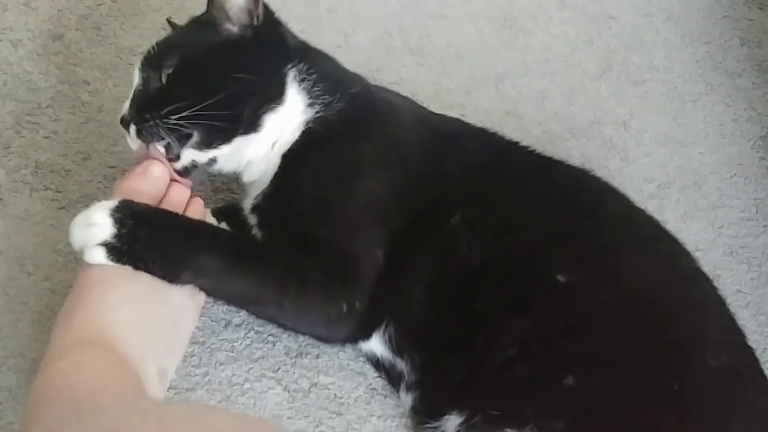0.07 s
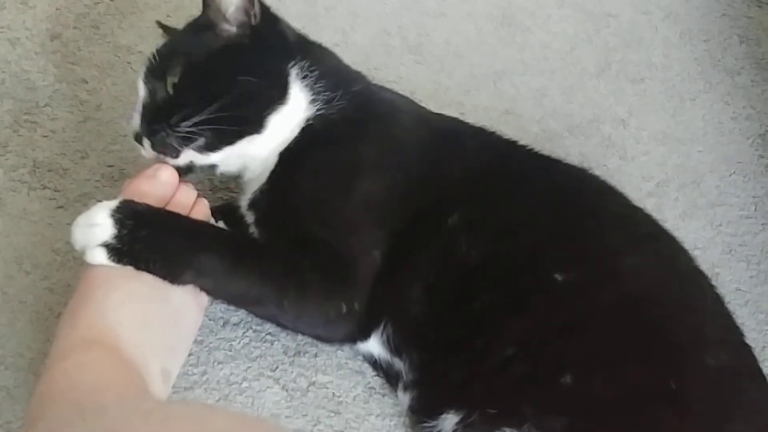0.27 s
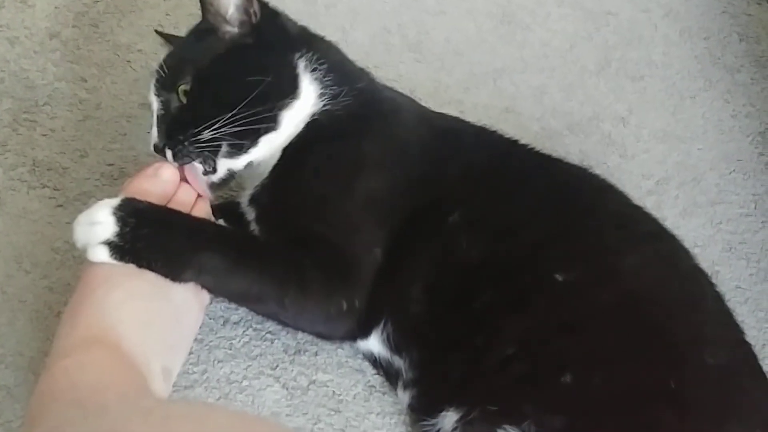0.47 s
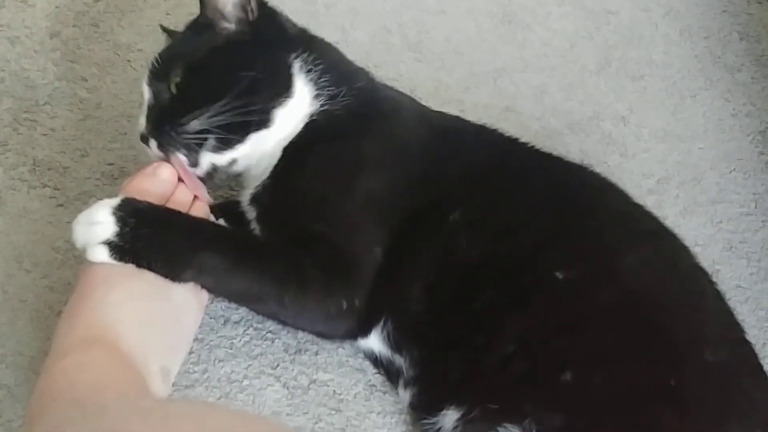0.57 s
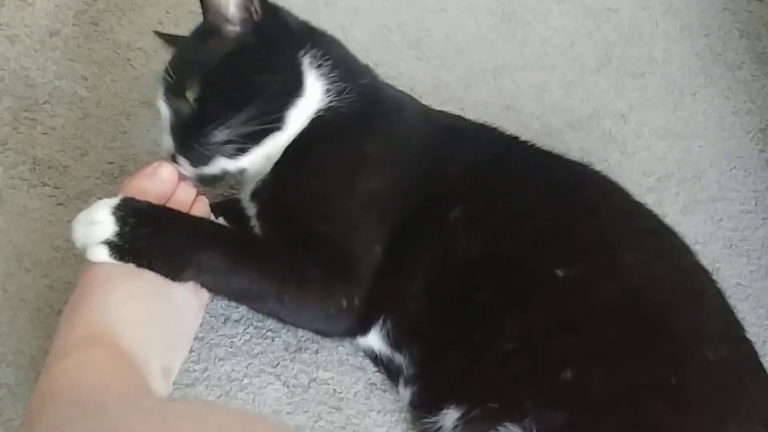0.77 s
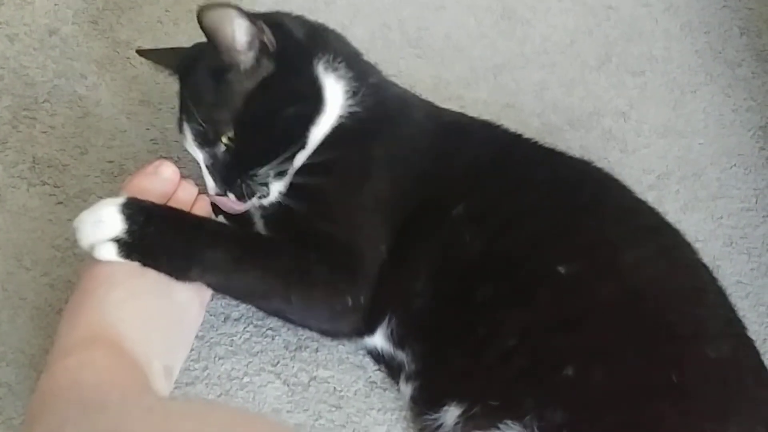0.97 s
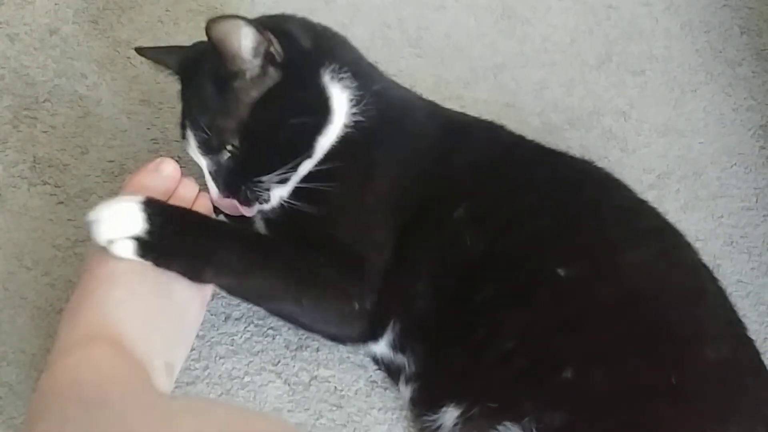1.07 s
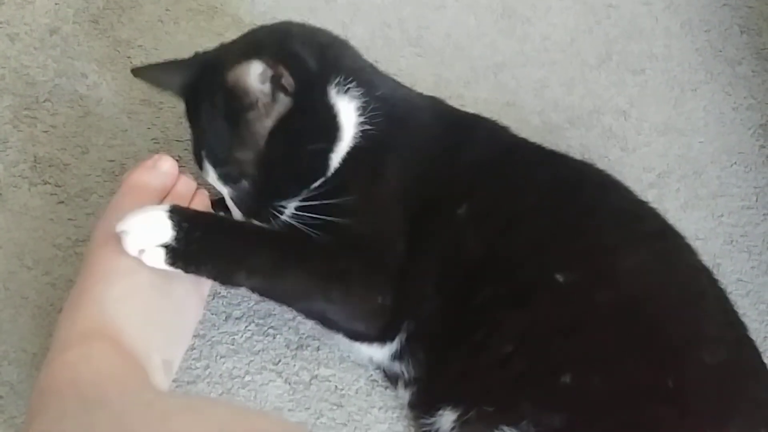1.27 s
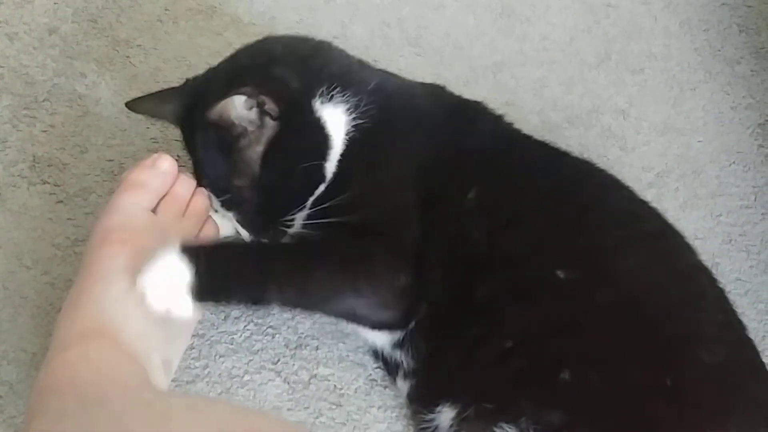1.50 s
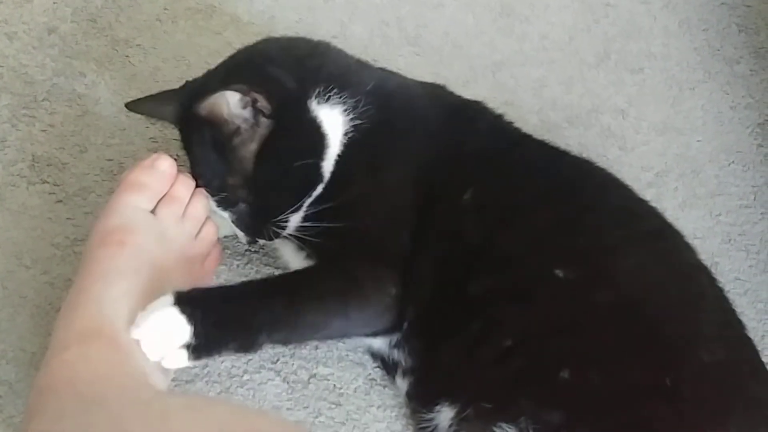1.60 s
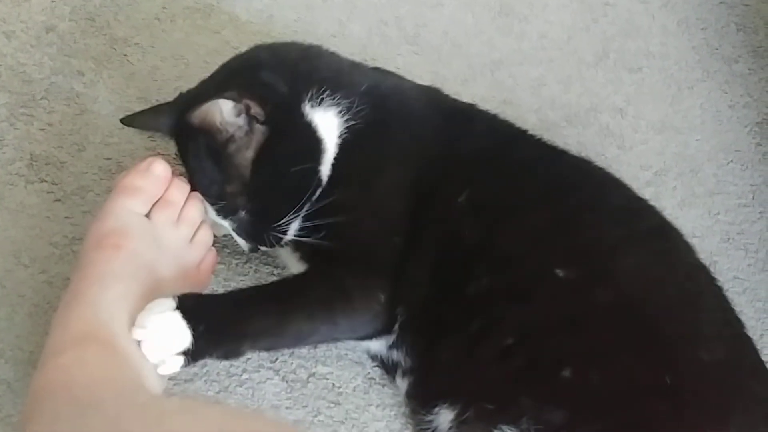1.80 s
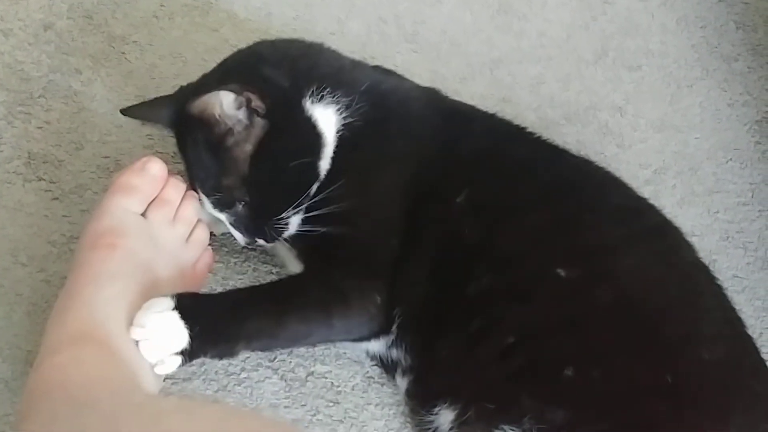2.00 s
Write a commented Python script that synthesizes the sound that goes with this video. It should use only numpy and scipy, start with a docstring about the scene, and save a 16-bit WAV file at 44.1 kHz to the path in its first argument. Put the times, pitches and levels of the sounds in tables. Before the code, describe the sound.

Faint wet cat licks on skin in a quiet room, with one sharp knock.

```python
"""A quiet carpeted room, heard from a hand-held recorder: off to the left, a cat licks a bare foot.
Its barbed tongue rasps faintly on the skin, its wet mouth clicks and smacks, and near the end the fur
of a paw brushes down the foot. One sharp, dull knock, probably a finger on the case, lands by the
right microphone. Hiss, a faint hum and a low rumble lie under it all."""
import sys
import numpy as np
from scipy import signal
from scipy.io import wavfile

SR = 44100
rng = np.random.default_rng(int(sys.argv[2]) if len(sys.argv) > 2 else 0)


def file_out(sig):
    """Save sig as 16-bit WAV at sys.argv[1]."""
    # one column per channel
    cols = np.atleast_2d(sig).T
    # limit, then scale
    lim = np.clip(cols, -1, 1)
    pcm = np.round(lim * 32767).astype(np.int16)
    wavfile.write(sys.argv[1], SR, pcm)


N = 90404


def from_db(db):
    """Decibels to gain."""
    return 10 ** (np.asarray(db) / 20)


def rms_one(x):
    """Scale to unit rms."""
    return x / np.sqrt(np.mean(x ** 2) + 1e-20)


def at_hz(points, hz):
    """Read a table on a log-frequency axis."""
    freqs, values = np.transpose(points)
    return np.interp(np.log(hz), np.log(freqs), values)


def cut(x, hz, kind, order=2):
    """Butterworth filter."""
    sos = signal.butter(order, np.clip(hz, 10, .47 * SR), kind, fs=SR, output="sos")
    return signal.sosfilt(sos, x + 1e-18)


def band(x, hz, width, order=2):
    """Flat-topped resonance of a relative width."""
    return cut(x, hz * np.exp(np.array([-.5, .5]) * width), "band", order)


def bell(x, hz, db, q):
    """One peak or dip."""
    w, g = 2 * np.pi * hz / SR, from_db(db / 2)
    a = np.sin(w) / (2 * q)
    return signal.lfilter([1 + a * g, -2 * np.cos(w), 1 - a * g],
                          [1 + a / g, -2 * np.cos(w), 1 - a / g], x)


def impulse(s):
    """A unit click at one moment."""
    return (np.arange(N) == int(s * SR)) * 1.


def swell(start, length, attack_share=.18):
    """Pressure of one stroke: a quick rise and a slower fall."""
    progress = (np.arange(N) / SR - start) / length
    return np.sqrt(np.interp(progress, [0, attack_share, 1], [0, 1, 0]))


def pan(x, left_db):
    """Full level at the left microphone, left_db weaker at the right."""
    return x * np.array([[1], [from_db(-left_db)]])


def room(x, t60_s=.125, delay_s=.0019, build_s=.011):
    """Short diffuse tail of a carpeted room, different at each microphone."""
    t = np.arange(SR // 3) / SR
    shape = np.clip((t - delay_s) / build_s, 0, 1) * np.exp(-np.log(1000) * t / t60_s)
    tail = rng.standard_normal((2, len(t))) * shape / np.linalg.norm(shape)
    return signal.fftconvolve(x[None], tail, axes=1)[:, :N]


def room_tone(level_db=-68):
    """Steady air and microphone hiss in third octaves, largely unlike on the two sides."""
    # spectrum of the noise floor: (frequency [Hz], relative density [dB])
    spectrum = [(30, -32), (50, -12.5), (70, -7), (120, -8.5), (160, -8), (225, -12.5), (320, -13.5),
                (420, -16), (620, -16.5), (1100, -21.5), (2000, -24.5), (4600, -28.5), (7500, -33.5),
                (10300, -37.5), (12500, -36.5), (15000, -32.5)]
    # likeness of the two microphones: (frequency [Hz], correlation [-1..1])
    likeness = [(60, 0.15), (180, 0.085), (550, 0.17), (1650, -0.14), (4970, -0.021), (15000, -0.1)]
    # lean to the left: (frequency [Hz], left minus right [dB])
    lean = [(60, 2.5), (130, 1.5), (290, 3.5), (640, 3.0), (1410, 2.5), (3100, 1), (6820, 1.5),
            (15000, 3.5)]
    edges_hz = 28 * 2 ** (np.arange(29) / 3)
    sides = np.array([[1], [-1]])
    white = rng.standard_normal((2, 2, N))
    air = 0
    for k, (low, high) in enumerate(zip(edges_hz, edges_hz[1:])):
        mid, side = cut(white[k % 2], [low, high], "band")  # neighbouring bands are independent
        hz = np.sqrt(low * high)
        alike = at_hz(likeness, hz)
        gain = from_db(at_hz(spectrum, hz) + sides * at_hz(lean, hz) / 2)
        air += gain * (np.sqrt(1 + alike) * mid + np.sqrt(1 - alike) * side * sides)
    return from_db(level_db) * rms_one(air)


def hum(width_hz=10):
    """The room hums in three faint wavering tones, each a narrow band of noise."""
    # tones of the hum: (frequency [Hz], level [dB])
    tones = [(70, -80.5), (157, -81), (318, -83)]
    drone = 0
    for hz, db in tones:
        tone = band(rng.standard_normal(N + SR), hz, width_hz / hz)[SR:]  # a second to settle
        drone += from_db(db) * rms_one(tone)
    return drone


def rumble():
    """A soft low rumble comes and goes, nearly in phase at both microphones."""
    # rise and fall of the rumble: (time [s], level [dB])
    contour = [(0, -67), (.14, -61), (.3, -65.5), (.39, -61), (.46, -73), (.56, -82), (0.631, -64),
               (.7, -77), (0.851, -73), (.91, -63.5), (.97, -78.5), (1.07, -66), (1.2, -65), (1.29, -74.5),
               (1.68, -75), (1.79, -61.5), (1.88, -79), (2.03, -68)]
    level = from_db(np.interp(np.arange(N) / SR, *np.transpose(contour)))
    mid, side = rms_one(band(rng.standard_normal((2, N)), hz=73.9, width=.35))
    return level * (mid + from_db(-18.5) * side * np.array([[1], [-1]]))


def tongue(strokes, skirt_hz, skirt_width, skirt_db, barbs_per_s=2000, spread_db=1.5):
    """Barbs catch and slip in a dense crackle that swells with each stroke: a peak on a broad skirt."""
    sizes = from_db(spread_db * np.minimum(rng.exponential(1, N), 4)) * rng.choice([-1, 1], N)
    slips = sizes * (rng.random(N) < barbs_per_s / SR)
    skirt = from_db(skirt_db) * rms_one(band(slips, skirt_hz, skirt_width))
    return sum(from_db(db) * swell(start, length) * (rms_one(band(slips, hz, width)) + skirt)
               for start, length, db, hz, width in strokes)


def licks():
    """The tongue drags over skin with a thin, high rasp."""
    # tongue strokes: (start [s], length [s], level [dB], pitch [Hz], width [ratio])
    strokes = [(-.03, 0.13, -75, 7300, 0.22), (.075, 0.14, -73.5, 7400, 0.17),
               (.594, 0.057, -74.5, 7500, 0.28), (.64, 0.1, -82, 7450, 0.31),
               (1.326, 0.025, -70, 7480, 0.1), (1.74, 0.012, -88, 8100, 0.14)]
    return tongue(strokes, skirt_hz=14500, skirt_width=.2, skirt_db=-5.5)


def wet_clicks(ring_hz=3640, top_hz=8050):
    """Films of saliva snap, each at its own pitch, and ring the mouth; the top falls off steeply."""
    # snapping films: (time [s], impulse level [dB], pitch [Hz], relative level of the ring [dB])
    films = [(0.3468, -42.5, 4600, 11.5), (0.3472, -19.5, 5960, -25), (0.3493, -14, 7150, -4.5),
             (0.3523, -16.5, 7920, -12), (0.357, -23.5, 7600, -5.5), (0.4529, -27.5, 6400, -20),
             (0.4545, -28, 5100, -23), (.462, -34.5, 6200, -14), (0.047, -31.5, 7240, -20),
             (.252, -38, 7000, -24), (.403, -36, 6600, -9), (.427, -34, 4560, -6), (.848, -38.5, 6570, -10),
             (.9033, -36, 7600, -29)]
    clicks = 0
    for s, db, hz, ring_db in films:
        snap = from_db(db) * impulse(s)
        mouth_ring = from_db(ring_db) * band(snap, ring_hz, width=.35, order=4)
        clicks += band(snap, hz, width=.12) + mouth_ring
    return cut(clicks, top_hz, "low", order=12)


def knock(at_s=.2002, left_db=-38.5):
    """A pressure pulse runs through the case into the right microphone; the room answers faintly."""
    # peaks and dips of the case: (frequency [Hz], gain [dB], Q [ratio])
    case_colour = [(96, 16, 0.57), (614, -8, 8.9), (1192, -11, 3.2), (1622, -7, 10), (2505, 3, 8.5),
                   (3310, -8.5, 3.6), (3664, -3, 18), (4866, 27.5, 3.15)]
    hit = -impulse(at_s)
    body = cut(hit, 61.2, "high", order=6)
    body = from_db(16) * cut(body, 1950, "low", order=6)
    for hz, db, q in case_colour:
        body = bell(body, hz, db, q)
    tick = from_db(-24.5) * band(hit, hz=8140, width=.082)
    through_case = (body + tick) * np.array([[from_db(left_db)], [1]])
    airborne = cut(cut(hit, 350, "high", order=1), 3050, "low")
    return through_case + from_db(-21.5) * room(airborne)


def lip_smacks():
    """Tongue and lips smack in short crackles that ring the mouth, lower than the rasp."""
    # smacks: (start [s], length [s], level [dB], mouth resonance [Hz], width [ratio])
    strokes = [(1.311, 0.014, -70.5, 1950, 0.21), (1.323, 0.014, -70.5, 1950, 0.29),
               (1.334, 0.0081, -71.5, 4100, 0.27), (1.727, .014, -71, 1990, 0.48),
               (1.732, 0.039, -76, 3950, 0.14)]
    return tongue(strokes, skirt_hz=1830, skirt_width=1.55, skirt_db=-.5)


def paw():
    """Soft, dull friction of fur on skin as the paw slides down the foot."""
    # brushes of fur: (start [s], length [s], level [dB])
    brushes = [(1.53, 0.45, -77), (1.69, 0.32, -77), (1.907, 0.43, -75.5)]
    friction = rms_one(band(rng.standard_normal((2, N)), hz=690, width=.74))
    return friction * sum(from_db(db) * swell(start, length) for start, length, db in brushes)


def scene():
    """The cat to the left, the knock on the right, the room around them."""
    clicks, rasp, smacks = wet_clicks(), licks(), lip_smacks()
    mouth = pan(clicks, left_db=37) + pan(rasp, left_db=11) + pan(smacks, left_db=20)
    fur = pan(paw(), left_db=7)
    into_room = from_db(-12.5) * clicks + from_db(-6.5) * (rasp + smacks)
    cat = mouth + fur + pan(room(into_room), left_db=1)
    return cat + knock() + room_tone() + pan(hum(), left_db=1.5) + pan(rumble(), left_db=7.5)


def record(dry):
    """The recorder cuts the top steeply."""
    cutoff_hz = 15750
    return signal.sosfilt(signal.ellip(10, .2, 70, cutoff_hz, fs=SR, output="sos"), dry)


dry = scene()
out = record(dry)
file_out(out)
```